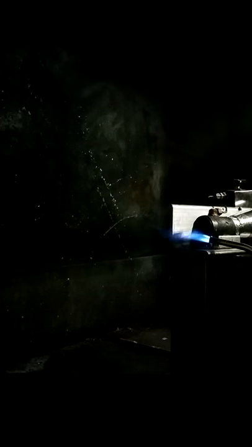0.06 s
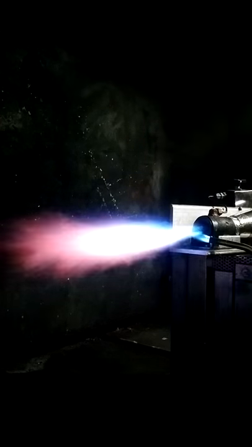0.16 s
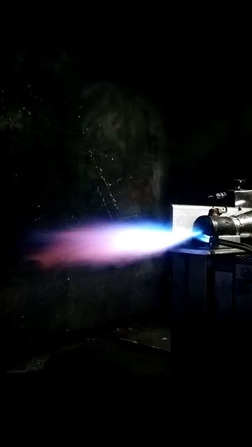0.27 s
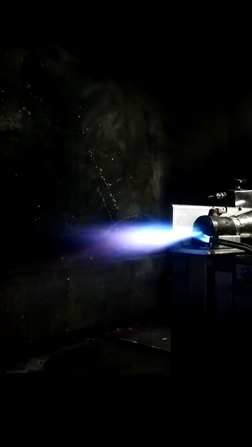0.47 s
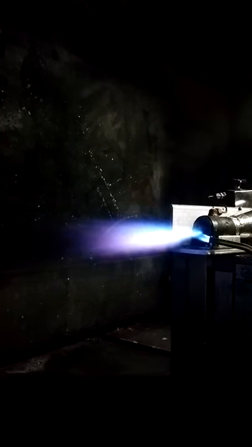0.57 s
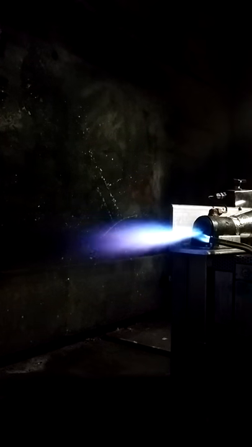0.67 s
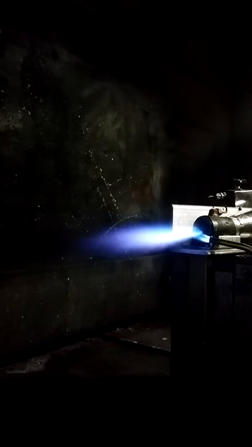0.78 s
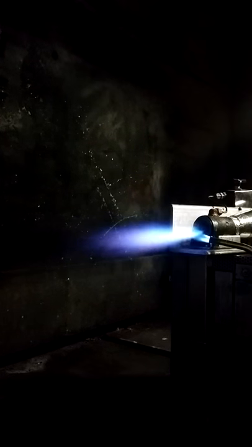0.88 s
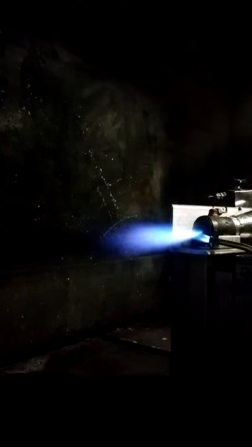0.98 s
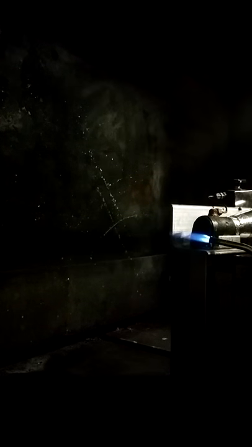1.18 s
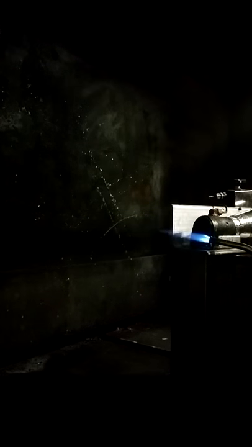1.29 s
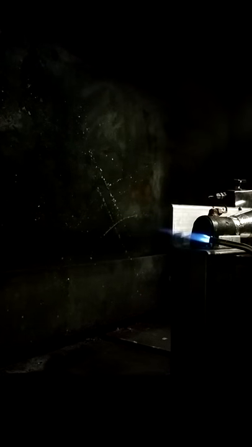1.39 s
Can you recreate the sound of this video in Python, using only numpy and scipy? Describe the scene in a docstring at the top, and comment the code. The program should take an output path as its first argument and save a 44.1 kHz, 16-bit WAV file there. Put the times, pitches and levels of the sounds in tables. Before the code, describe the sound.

A gas burner is heard close up in a hard-walled chamber, starting with the soft rumble of its pilot flame. At about 0.2 seconds a thin hiss swells into a sudden loud jet of flame, with a brief airy whistle as it catches. The hollow roar and hiss ring the chamber and slowly weaken, then cut off at around 1.2 seconds, leaving the pilot fluttering quietly.

```python
"""Gas burner in a hard-walled chamber

A pilot flame rumbles; the valve opens and a jet of flame roars for one second, sagging slowly, then
drops back to the pilot. The turbulent roar rings the chamber and the nozzle hisses.
Heard from close by on a stereo pair of microphones, through a fast limiter."""
import sys
import numpy as np
from scipy import signal
from scipy.fft import rfft, irfft, next_fast_len
from scipy.io import wavfile
from scipy.ndimage import uniform_filter1d, minimum_filter1d

SR = 44100
rng = np.random.default_rng(int(sys.argv[2]) if len(sys.argv) > 2 else 0)


def unload_wav(signal):
    """Save mono or channel-first audio to the path in sys.argv[1] as 16-bit WAV at rate SR, clipped to [-1, 1]."""
    wavfile.write(
        sys.argv[1],
        SR,
        np.round(np.clip(np.atleast_2d(signal).T, -1, 1) * 32767).astype(np.int16),
    )


N = 63945
FLUTTER_HZ = 28


def undb(db):
    """Decibels to gain."""
    return 10 ** (np.asarray(db) / 20)


def along(points, hz):
    """Read (Hz, value) points on a log-frequency axis."""
    freqs, values = np.array(points, float).T
    return np.interp(np.log(hz + 1), np.log(freqs), values)


def colour(x, db_at):
    """Causal, minimum-phase filter whose gain in dB is the function db_at(Hz)."""
    size = next_fast_len(2 * N) // 2 * 2
    hz = np.arange(size // 2 + 1) * SR / size
    cepstrum = irfft(np.log(undb(db_at(hz))), size)
    cepstrum[1:size // 2] *= 2
    cepstrum[size // 2 + 1:] = 0
    return irfft(rfft(x, size) * np.exp(rfft(cepstrum)), size)[..., :N]


def wander(rate_hz):
    """Smooth random drift with spread 1."""
    span = max(int(SR / rate_hz), 2)
    drift = uniform_filter1d(rng.standard_normal(N), span, mode="wrap")
    drift = uniform_filter1d(drift, span, mode="wrap")
    return drift / drift.std()


def turbulence(spectrum):
    """Noise of churning gas, rms 1: alike at both microphones in the bass, far less so in the treble."""
    # Likeness across the pair. Each row: frequency in Hz, correlation from 0 to 1.
    likeness = [(60, .95), (130, .96), (400, .97), (640, .92), (1400, .6), (3000, .35), (6000, .15)]
    # The left microphone mostly lags. Each row: frequency in Hz, its phase lead in radians.
    left_phase = [(130, 0), (600, -.15), (800, .1), (1000, -.7), (1450, -1.0), (1600, -3.3), (1850, -5),
                  (2300, -6), (3000, -5.8)]
    hz = np.arange(N // 2 + 1) * SR / N
    alike = np.clip(along(likeness, hz), 0, 1)
    mid, side = rfft(rng.standard_normal((2, N))) * undb(along(spectrum, hz))
    mid, side = mid * np.sqrt(1 + alike), side * np.sqrt(1 - alike)
    left_lag = np.exp(1j * along(left_phase, hz))
    noise = irfft(np.array([(mid + side) * left_lag, mid - side]), N)
    return noise / noise.std()


def echoes(t, t60_s, above_hz):
    """Dense wall reflections that die away; energy 1 in each channel."""
    tail = rng.standard_normal((2, N)) * undb(-60 * t / t60_s) * (t > .001)
    tail = signal.sosfilt(signal.butter(2, above_hz, "high", fs=SR, output="sos"), tail)
    return tail / np.sqrt(np.sum(tail ** 2, axis=1, keepdims=True))


def chamber(x, t):
    """Near walls reflect at once, a short tail and a longer, duller one follow, and resonances ring."""
    # Chamber resonances. Each row: frequency in Hz, width in Hz, lift in dB, left minus right in dB.
    modes = [(58.5, 23, 10.5, -5.5), (111, 30, 7.5, -3.5), (151, 19, 7.5, -1), (159, 36, 10.5, -2.5),
             (263.2, 22.2, 15.5, -4), (330.7, 16.6, 9, -9), (411.5, 3.24, 14, -5), (465.7, 7.2, 10.5, -7.5),
             (535, 103, 4, -3.5), (641, 7.2, 7, -2), (789.6, 24, 12, 0), (849, 60, 4.5, -8),
             (1020.6, 9.6, 9.5, 3), (1134, 27, 4, -10), (1475, 53, 4.5, -6), (1566, 41, 4.5, -3),
             (1713, 11, 9, 3.5), (2218, 44, 4, 0), (2492, 33, 6, 2), (3408, 92, 2.5, -3)]
    early = undb(-6) * echoes(t, t60_s=.04, above_hz=2290)
    short = undb(-5.5) * echoes(t, t60_s=.19, above_hz=1060)
    far = undb(-14) * echoes(t, t60_s=.52, above_hz=1210)
    far = signal.sosfilt(signal.butter(2, 6500, fs=SR, output="sos"), far)
    wet = x + signal.fftconvolve(x, early + short + far, axes=1)[:, :N]

    def lift_db(hz, side):
        power = 1
        for centre, width, db, balance_db in modes:
            excess = undb(max(db + side * balance_db, 0)) ** 2 - 1
            power += excess / (1 + (2 * (hz - centre) / width) ** 2)
        return 10 * np.log10(power)
    return np.array([colour(wet[0], lambda hz: lift_db(hz, side=.5)),
                     colour(wet[1], lambda hz: lift_db(hz, side=-.5))])


def pilot(t):
    """The small flame flutters softly throughout, heard before and after the jet."""
    # Low rumble of the pilot. Each row: frequency in Hz, relative level in dB.
    spectrum = [(15, -41), (40, -11), (64, -3.5), (110, -7.5), (180, -16.5), (320, -26.5), (420, -20.5),
                (560, -19), (800, -23.5), (1200, -28.5), (2000, -31), (3000, -43), (6000, -51.5),
                (15000, -60)]
    # Its rise and fall. Each row: time in seconds, level in dB.
    levels = [(0, -33), (.12, -34.5), (.17, -30.5), (.25, -26), (1.25, -44.5), (1.45, -38.5)]
    level_db = np.interp(t, *np.array(levels).T)
    return turbulence(spectrum) * undb(level_db - .5 * wander(FLUTTER_HZ))


def nozzle_whistles(t):
    """The nozzle sounds brief, airy notes as the flame catches."""
    # Each row: peak time and spread in seconds, pitch and half-width in Hz, level in dB.
    notes = [(0.233, 0.011, 840, 90, -30), (0.247, 0.011, 2190, 69.5, -16)]
    whistles = 0
    for peak_s, spread_s, hz, width, db in notes:
        band = [(hz / 2, -60), (hz - width, -18), (hz, 0), (hz + width, -18), (hz * 2, -60)]
        envelope = np.exp(-.5 * ((t - peak_s) / spread_s) ** 2)
        whistles += turbulence(band) * undb(db) * envelope
    return whistles


def jet_band(t, spectrum, start_s, full_s, shut_s, db, sag_db_per_s, release_db_per_s, flutter_db):
    """One band of the jet: swells as the valve opens, flutters and sags, dies when the valve shuts."""
    swell = np.clip((t - start_s) / (full_s - start_s), 0, 1) ** 2.2
    fall_db = sag_db_per_s * np.maximum(t - full_s, 0) + release_db_per_s * np.maximum(t - shut_s, 0)
    return turbulence(spectrum) * swell * undb(db - fall_db + flutter_db * wander(FLUTTER_HZ))


def jet(t):
    """Gas hisses thinly, then rumbles and roars over the nozzle's hiss; a hollow flare fades sooner."""
    # Spectra of the flame and the nozzle. Each row: frequency in Hz, relative level in dB.
    rumble_spectrum = [(15, -14), (35, -23), (60, -3.5), (130, 1.5), (190, -8.5), (300, -40), (900, -71)]
    roar_spectrum = [(90, -10.5), (230, -10.5), (420, 3), (560, -2.5), (800, -9.5), (1400, -12),
                     (4000, -48)]
    rush_spectrum = [(200, -22), (700, -9), (1200, 2.5), (2000, 0), (3400, -5.5), (4400, -14),
                     (6500, -12.5), (8000, -27), (16000, -43)]
    hiss_spectrum = [(1200, -32), (3000, 0), (5500, -0.5), (7500, 0), (11000, -0.5), (13000, -2.5),
                     (16000, -7.5)]
    flare_spectrum = [(150, -40), (265, -8), (320, -12), (400, -3), (480, 0), (560, -1), (680, -22),
                      (1500, -55)]
    rumble = jet_band(t, rumble_spectrum, start_s=.205, full_s=.25, shut_s=1.14,
                      db=-16, sag_db_per_s=6, release_db_per_s=108, flutter_db=1.0)
    roar = jet_band(t, roar_spectrum, start_s=.2, full_s=.252, shut_s=1.205,
                    db=-8, sag_db_per_s=13.5, release_db_per_s=171, flutter_db=.43)
    rush = jet_band(t, rush_spectrum, start_s=.185, full_s=.245, shut_s=1.218,
                    db=-11, sag_db_per_s=8.5, release_db_per_s=265, flutter_db=1.5)
    hiss = jet_band(t, hiss_spectrum, start_s=.215, full_s=.365, shut_s=1.215,
                    db=-13.5, sag_db_per_s=11.5, release_db_per_s=286, flutter_db=1.34)
    first_gas = jet_band(t, hiss_spectrum, start_s=.17, full_s=.225, shut_s=1.215,
                         db=-34, sag_db_per_s=10, release_db_per_s=300, flutter_db=-6.5)
    flare = jet_band(t, flare_spectrum, start_s=.21, full_s=.265, shut_s=1.205,
                     db=-9, sag_db_per_s=22, release_db_per_s=200, flutter_db=2.0)
    crackle = undb(.1 * wander(rate_hz=480))  # a very slight, fast flicker in level
    return first_gas + flare + rumble + roar + (rush + hiss) * crackle


def scene():
    """Pilot and jet burn in the same chamber."""
    t = np.arange(N) / SR
    return chamber(pilot(t) + jet(t) + nozzle_whistles(t), t)


def record(dry):
    """Each close microphone has its own colour; a fast limiter holds the peaks down; the top is cut."""
    # Responses of the two microphones. Each row: frequency in Hz, gain in dB.
    left_response = [(100, -5.4), (400, -1.5), (900, -0.5), (1400, 3), (1700, -3), (2200, 0), (2800, -2.5),
                     (5000, -0.5), (8500, -3.5), (11000, -2.5), (15000, -6)]
    right_response = [(100, -8.4), (500, -6), (950, -2.5), (1300, 0), (1590, 7.5), (1730, 2.5), (1930, 7),
                      (2300, 1), (2750, 1.5), (3370, 6.5), (4400, -1), (5400, 3.5), (7000, -1), (8700, 3.5),
                      (10500, -4.5), (12000, -16), (14200, -15), (15000, -50)]
    ceiling, limiter_s, top_hz = .85, .0009, 15600
    pair = np.array([colour(dry[0], lambda hz: along(left_response, hz)),
                     colour(dry[1], lambda hz: along(right_response, hz))])
    span = int(limiter_s * SR) // 2 * 2 + 1
    needed_gain = ceiling / np.maximum(np.abs(pair), ceiling)
    gain = uniform_filter1d(minimum_filter1d(needed_gain, span), span)
    return signal.sosfilt(signal.ellip(10, .1, 80, top_hz, fs=SR, output="sos"), pair * gain)


dry = scene()
out = record(dry)
unload_wav(out)
```